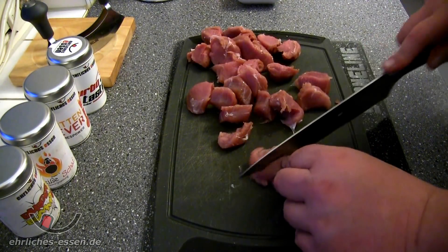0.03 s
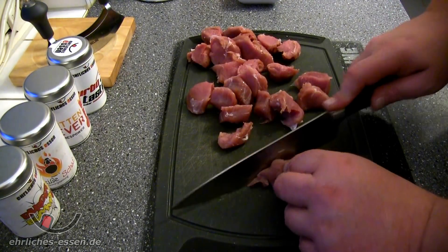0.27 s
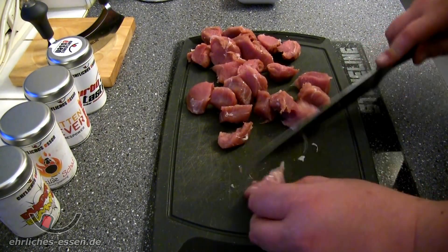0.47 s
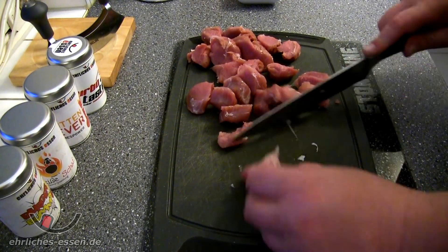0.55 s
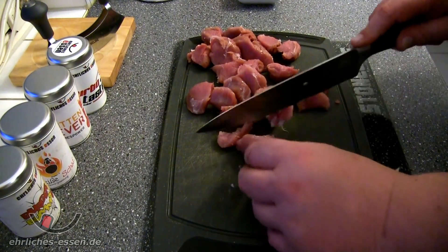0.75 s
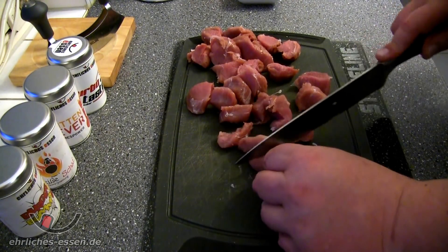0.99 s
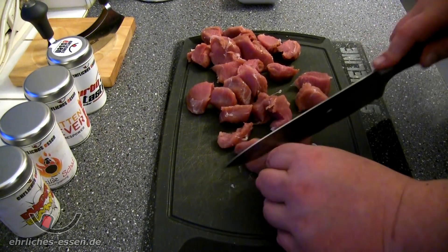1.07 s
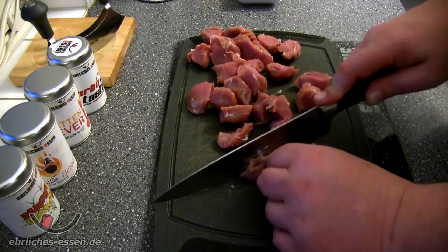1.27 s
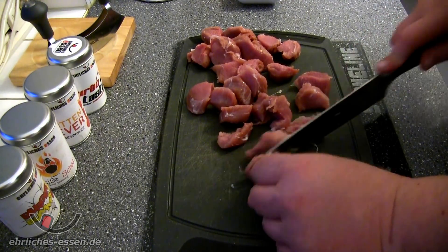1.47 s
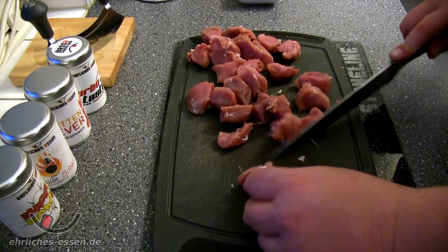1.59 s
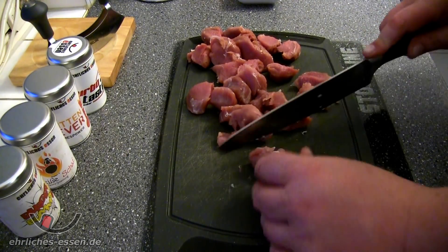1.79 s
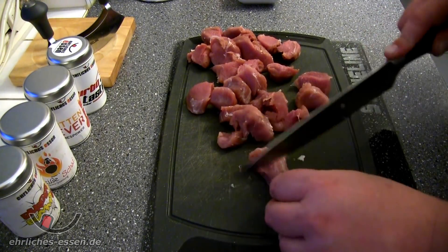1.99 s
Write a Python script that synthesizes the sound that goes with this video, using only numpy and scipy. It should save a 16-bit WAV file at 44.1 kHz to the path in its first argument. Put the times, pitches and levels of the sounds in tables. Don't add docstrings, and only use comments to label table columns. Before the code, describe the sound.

Knife strokes through raw meat: sharp board knocks, a raspy scrape, a ringing flick, then again

```python
import sys
import numpy as np
from scipy import signal
from scipy.fft import rfft, irfft
from scipy.io import wavfile

SR = 44100
rng = np.random.default_rng(int(sys.argv[2]) if len(sys.argv) > 2 else 0)


def log_audio(samples):
    frames = np.atleast_2d(samples).T
    limited = np.clip(frames, -1, 1)
    pcm = np.round(limited * 32767).astype(np.int16)
    wavfile.write(sys.argv[1], SR, pcm)


def nominal_scale(level):
    x = np.asarray(level, float) / 20
    return 10 ** x


N = 90404
OWN_SHARE = .2
THUD_HZ = 800


def rms_one(x):
    return x / np.sqrt(np.mean(x ** 2) + 1e-20)


def split_at(x, hz):
    return [signal.sosfilt(signal.butter(2, hz, kind, fs=SR, output="sos"), x) for kind in ("low", "high")]


def colour(x, points):
    size = 2 ** 17
    hz, db = np.transpose(points)
    bins_hz = np.arange(size // 2 + 1) * SR / size
    log_gain = np.interp(np.log(bins_hz + 1), np.log(hz), db) * np.log(10) / 20
    cepstrum = irfft(log_gain)
    cepstrum[1:size // 2] *= 2
    cepstrum[size // 2 + 1:] = 0
    return irfft(rfft(x, size) * np.exp(rfft(cepstrum)))[..., :N]


def ring(x, hz, t60):
    r, w = nominal_scale(-60 / (t60 * SR)), 2 * np.pi * hz / SR
    return signal.lfilter([0, np.sin(w)], [1, -2 * r * np.cos(w), r * r], x + 1e-18)


def width_t60(width_hz):
    return np.log(1000) / np.pi / width_hz


def pair(x, share):
    return np.sqrt(1 - np.clip(share, 0, 1) ** 2) * x[0] + share * x[1:]


def wobble(rate_hz, size):
    r = np.exp(-2 * np.pi * rate_hz / SR)
    return rms_one(signal.lfilter([1], [1, -2 * r, r * r], rng.standard_normal(size)))


def strokes(tables):
    t, out = np.arange(N) / SR, 0
    for rows in tables:
        s, db, bright_db, weight_db = np.transpose(rows)
        fade = np.clip(np.minimum(t - s[0], s[-1] - t) / 0.0065, 0, 1)
        gains = nominal_scale([np.interp(t, s, db + extra) for extra in (0 * db, bright_db, weight_db)])
        out = out + fade * gains
    return out


def slips():
    slips_per_s, spread_db, chatter_db, chatter_hz = 5000, 1, -1, 48.6
    size = nominal_scale(spread_db * np.minimum(rng.exponential(1, (3, N)), 4)) * rng.choice([-1, 1], (3, N))
    clicks = size * (rng.random((3, N)) < slips_per_s / SR)
    return rms_one(pair(clicks, OWN_SHARE) * nominal_scale(chatter_db * wobble(chatter_hz, N)))


def resonances(drive, peaks):
    out, t = 0, np.arange(N) / SR
    second_s, tilt_times_s, sag = 1.1, (.515, 1.628), .82
    for half, tilt_s, spot in zip((t < second_s, t >= second_s), tilt_times_s, peaks):
        push = drive * half
        for k, (hz, width, db) in enumerate(spot):
            gain, t60 = nominal_scale(db) * np.sqrt(width) * (-1) ** k, width_t60(width)
            if 1200 < hz < 1400:
                upright = ring(push * (t < tilt_s), hz, t60)
                tipped = ring(push * (t >= tilt_s), hz * sag, t60 / 2)
                out = out + gain * (upright + tipped)
            else:
                out = out + gain * ring(push, hz, t60)
    return out


def edge_on_board(tables, board, peaks, ring_db, firm_db):
    # f/Hz, level/dB per Hz
    rasp_spectrum = [(1500, -30.5), (2800, 0.5), (4000, -0.5), (5200, -2.5), (7400, -7), (11000, -12.5),
                     (14000, -21), (16000, -22)]
    weight_hz, weight_boost_db = 690, 6
    press, bright, weight = strokes(tables)
    drive = slips()
    low, high = split_at(drive, weight_hz)
    body = press * high - nominal_scale(weight_boost_db) * weight * low
    coupled = body * np.minimum(press / nominal_scale(firm_db), 1)
    rings = resonances(coupled, peaks)
    broad = colour(body, board)
    rasp = colour(bright * drive * rng.choice([-1, 1], N), rasp_spectrum)
    body_level = np.sqrt(np.mean(press ** 2 + weight ** 2)) * nominal_scale(-5)
    rasp_level = np.sqrt(np.mean(bright ** 2))
    return body_level * (rms_one(broad) + nominal_scale(ring_db) * rms_one(rings)) + rasp_level * rms_one(rasp)


def cutting():
    # t/s, pressure level/dB, brightness/dB, weight/dB
    cuts = [
        [(.06, -67.5, 7, 9), (.13, -57, 0, 12.5), (.232, -39, -2.5, 10.5), (.2385, -22, -13.5, 4.5),
         (.262, -18, -17, -18.5), (.282, -20.5, -19, -12), (.34, -37.5, -16, -5), (.37, -72, -17, -2)],
        [(1.2, -74, 6, -9), (1.24, -46, -6, 2), (1.27, -45, -11, 6.5), (1.3075, -44, -1, 14.5),
         (1.3095, -19.5, -14.5, 0), (1.324, -27.5, -9.5, -3.5), (1.39, -38, -23, -2.5), (1.43, -53, -18, 14)],
    ]
    # f/Hz, width/Hz, level/dB
    peaks = [
        [(548, 35, -8), (1290, 90, -4), (1450, 50, -4), (1834, 40, -1), (2005, 45, -5), (2855, 80, -3),
         (4820, 50, -14), (7600, 70, -22)],
        [(550, 40, -11), (1291, 35, 2), (1810, 82, -7), (2135, 40, -3), (2630, 45, -9), (2990, 42, -6),
         (3850, 80, -10), (4400, 60, -11), (7900, 40, -17)],
    ]
    # f/Hz, level/dB per Hz
    board = [
        [(50, -43), (130, 6.5), (300, -15.5), (600, -7.5), (820, -7), (1600, -5.5), (4000, -15.5),
         (7000, -41.5)],
        [(50, -93), (130, -3.5), (300, -20), (580, 1), (820, -6), (1300, 10), (4000, -2.5), (7000, -27)],
    ]
    return edge_on_board(cuts, board[0], peaks, ring_db=-3, firm_db=-44)


def scraping():
    # t/s, pressure level/dB, brightness/dB, weight/dB
    scrapes = [
        [(0.35, -39.5, -15, -2), (0.438, -27.5, -6.5, 3), (0.448, -31, -2.5, 7), (0.526, -30, -5.5, 7),
         (0.536, -28, -8, 10.5), (0.566, -27.5, -3, -27), (0.618, -43, 3.5, -17), (0.636, -33.5, -14, -4),
         (0.68, -43, -7, -12)],
        [(1.41, -45, -14, 11), (1.492, -35, -7, -25), (1.504, -29.5, -5, -18), (1.518, -31.5, -9, -81),
         (1.6, -29, -6, -4.5), (1.676, -36.5, -7.5, 14.5), (1.708, -27, -1.5, -11), (1.82, -42.5, -17, -16),
         (2.05, -53, -4.5, -23)],
    ]
    # f/Hz, width/Hz, level/dB
    peaks = [
        [(562, 32, -6.5), (1254, 20, -15), (1303, 29, 5), (1472, 27, -11), (1928, 19, -5), (2324, 32, -2),
         (2850, 44, -28.5), (3620, 30, -15), (4300, 68, -28), (5340, 35, -30), (7150, 120, -11),
         (10020, 88, -14)],
        [(556.5, 13, -6), (635, 42, -7.5), (1110, 53, 3.5), (1319, 37, 4.5), (1990, 35, -14), (2285, 48, -6),
         (2810, 72, -17), (3730, 30, -16), (4420, 65, -10), (5320, 79, -10), (6450, 40, -32)],
    ]
    # f/Hz, level/dB per Hz
    board = [
        [(50, -43), (130, 6.5), (300, -15.5), (600, -7.5), (820, -7), (1600, -5.5), (4000, -15.5),
         (7000, -41.5)],
        [(50, -93), (130, -3.5), (300, -20), (580, 1), (820, -6), (1300, 10), (4000, -2.5), (7000, -27)],
    ]
    return edge_on_board(scrapes, board[1], peaks, ring_db=1, firm_db=-26)


def knocks():
    # t/s, peak level/dB, thud level/dB
    hit_table = [(.1105, -24, 2.5), (0.2377, -5.5, -1.5), (.2700, -5.5, -11), (.5450, -10.5, 1),
                 (.5948, -5, -3), (.621, -38, -19), (1.2985, -26.5, 7), (1.3080, -5.5, -8.5),
                 (1.318, -30, 7.5), (1.329, -10, -17), (1.5010, -18, -25), (1.5440, -13, -30),
                 (1.558, -16, -25), (1.6005, -11, -23), (1.685, -38, -15), (1.691, -13, 6),
                 (1.7, -7.5, 4.5), (1.7068, -3.5, -26), (1.7185, -13, 2), (1.738, -8, 2),
                 (1.776, -23.5, 8.5)]
    # f/Hz, level/dB, t60/s
    modes = [(161, -16.5, 0.08), (569, -14.5, 0.45), (846, -51, 0.031), (1156, 5.5, 0.0074),
             (2110, -13, 0.084), (3150, -19, 0.015)]
    out, vary_db = 0, rng.normal(0, 1.9, (len(hit_table), len(modes)))
    s, db, thud_db = np.transpose(hit_table)
    for k, (hz, mode_db, t60) in enumerate(modes):
        hits = np.zeros((2, N))
        hits[:, (s * SR).astype(int)] = nominal_scale(db - 11.5 + mode_db + vary_db[:, k] + [thud_db, 0 * db])
        out = out + ring(hits, hz, t60)
    low, _ = split_at(out[0], THUD_HZ)
    _, high = split_at(out[1], THUD_HZ)
    return signal.lfilter(*signal.butter(1, 2600, fs=SR), high - low)


def blade():
    # t/s, length/s, level/dB, head start of the low modes/s
    flicks = [
        (0.549, 0.039, -19.5, .02),
        (1.687, 0.051, -23.5, .004),
    ]
    # f/Hz, level/dB, t60/s
    blade_modes = [
        [(549, -6, .13), (996, -12, .17), (1300, -9, .07), (1480, -6, .08), (1728, -18, .3), (2067, -20, .3),
         (2240, -19, .25), (2350, -16, .26), (3270, -15, .15), (5227, -18, .17), (6160, -25, .15),
         (7267, -26, .2), (8678, -25, .15), (10060, -27, .13)],
        [(312, -19, .5), (551, -6, .22), (921, -12, .35), (1475, -14, .2), (1717, -14, .25), (2330, -14, .15),
         (3138, -14, .25), (3257, -21, .28), (3970, -15, .15), (4247, -21, .25), (5416, -22, .2),
         (6200, -21, .22), (7400, -21, .12), (8646, -26, .25)],
    ]
    # f/Hz, width/Hz, level/dB
    bodies = [
        [(438, 30, -30), (992, 35, -26), (1220, 390, -24.5), (1466, 100, -25), (3770, 56, -37),
         (5200, 200, -35), (1570, 28, -48), (7400, 300, -37.5)],
        [(437, 43, -29.5), (685, 38, -27), (1150, 150, -27), (3130, 130, -29.5), (4000, 76, -31.5),
         (7370, 84, -41.5), (1630, 40, -34), (5440, 100, -40.5)],
    ]
    twin_hz, twin_db, flutter_db, flutter_hz = 19, -5, 5, 35
    out, t = np.zeros((2, N + SR)), np.arange(SR // 2) / SR
    for (s, length, db, lead), modes, peaks in zip(flicks, blade_modes, bodies):
        i = int((s - lead) * SR)
        part = out[:, i:i + len(t)]
        push = pair(rng.standard_normal((3, len(t))), OWN_SHARE)
        early, main = (np.sin(np.pi * np.clip((t - wait) / length, 0, 1)) for wait in (0, lead))
        for hz, width, peak_db in peaks:
            burst = push * (early if hz < THUD_HZ else main)
            part += nominal_scale(peak_db) * np.sqrt(width * 4 * np.pi / SR) * ring(burst, hz, width_t60(width))
        for hz, mode_db, t60 in modes:
            shape = (early + main if hz < THUD_HZ else 2 * main) / 2
            for step_hz, step_db in ((0, 0), (twin_hz * rng.choice([-1, 1]), twin_db)):
                swing = shape * np.sin(2 * np.pi * ((hz + step_hz) * t + rng.random())) * 2 / (length * SR)
                gain = nominal_scale(db + mode_db + step_db + 9.5 + flutter_db * wobble(flutter_hz, len(t)))
                part += gain * ring(swing, hz + step_hz, t60)
    return out[:, :N]


def ticks():
    # t/s, peak level/dB, f/Hz, t60/s
    tick_table = [(.757, -40, 11800, 0.03), (0.945, -47.5, 7900, 0.057), (1.092, -48, 5850, 0.024),
                  (1.168, -39.5, 6400, 0.029), (1.195, -41, 6400, 0.019), (1.211, -46, 9400, 0.27),
                  (1.242, -29.5, 4630, 0.18), (1.245, -41, 8700, 0.98), (1.242, -45, 13500, 0.28)]
    out, t = np.zeros((2, N)), np.arange(6000) / SR
    for s, db, hz, t60 in tick_table:
        i = int(s * SR)
        noise = pair(rng.standard_normal((3, len(t))), OWN_SHARE)
        band = signal.butter(2, [hz * 0.81, min(hz * 1.18, 20000)], "band", fs=SR, output="sos")
        out[:, i:i + len(t)] += nominal_scale(db) * signal.sosfilt(band, noise * nominal_scale(-60 * t / t60))
    return out


def squeaks():
    # t/s, f/Hz, level/dB
    tones = [
        [(1.85, 12620, -70), (1.88, 13100, -64), (1.906, 12540, -68), (1.95, 13270, -65), (1.974, 13400, -68),
         (1.99, 13780, -65), (2.004, 13550, -64), (2.022, 12850, -65), (2.04, 11850, -72)],
        [(1.922, 10450, -72), (1.95, 10950, -67), (1.976, 11250, -69)],
        [(1.975, 12600, -73), (1.992, 13150, -67), (2.014, 12550, -68)],
    ]
    rough_db, jitter_hz = 3, 25
    out, t = 0, np.arange(N) / SR
    for rows in tones:
        s, hz, db = np.transpose(rows)
        fade = np.clip(np.minimum(t - s[0], s[-1] - t) / .004, 0, 1)
        pitch_hz = np.interp(t, s, hz) + jitter_hz * wobble(140, N)
        gain = nominal_scale(np.interp(t, s, db) + rough_db * wobble(80, N))
        out = out + np.sqrt(2) * fade * gain * np.sin(2 * np.pi * np.cumsum(pitch_hz) / SR)
    return out


def worktop(mid):
    # f/Hz, level/dB
    width_spectrum = [(300, -12), (1200, -15), (2500, -8.5), (5000, -6.5), (9000, -10.5), (14000, -10)]
    wide = colour(mid, width_spectrum)
    echoes = [(nominal_scale(-4), lag_s) for lag_s in (0.001153, .0073, .0127)]
    return sum(gain * np.roll(wide, int(lag_s * SR)) for gain, lag_s in echoes) * [[1], [-1]]


def kitchen(x):
    t60_s, wall_cut_hz = 0.6, 13600
    size = 3 * 2 ** 16
    z = np.exp(-2j * np.pi * np.arange(size // 2 + 1) / size)
    dull, out = np.exp(-2 * np.pi * wall_cut_hz / SR), np.zeros((2, len(z)), complex)
    for k, lag in enumerate((rng.uniform(.012, .045, 20) * SR).astype(int)):
        loop = nominal_scale(-60 * lag / SR / t60_s) * (1 - dull) / (1 - dull * z) * z ** lag
        out[k % 2] += loop / (1 - loop) * (-1) ** (k // 2)
    for lag in (53, 131, 241):
        out *= (z ** lag - .6) / (1 - 0.77 * z ** lag)
    return irfft(out * rfft(x, size))[:, :N]


def hiss():
    # t/s, level/dB
    swell = [(0, 7.5), (.3, 18), (.9, 8.5), (1.03, 1.5), (1.2, 5), (1.8, 16.5), (2.05, 2.5)]
    # f/Hz, level/dB per Hz
    spectrum = [(25, -59), (60, -9.5), (120, -4.5), (550, 3), (900, -4.5), (2400, -10.5), (7000, -16),
                (13000, -22.5), (15600, -22.5)]
    s, db = np.transpose(swell)
    noise = colour(pair(rng.standard_normal((3, N)), .22), spectrum)
    return nominal_scale(-60 + np.interp(np.arange(N) / SR, s, db)) * rms_one(noise)


def scene():
    near = cutting() + scraping() + knocks() + blade() + ticks() + squeaks()
    near = signal.sosfilt(signal.butter(2, 261, "high", fs=SR, output="sos"), near)
    mid = near.mean(axis=0)
    near = near + worktop(mid)
    pan_db = 0.56
    return near * nominal_scale([[pan_db], [-pan_db]]) + nominal_scale(-21.5) * kitchen(mid) + hiss()


def roll_off(x):
    return signal.sosfilt(signal.butter(12, 15750, fs=SR, output="sos"), x)


def record(dry):
    left_bass_hz, left_bass_db = 133, 3.5
    bass = signal.lfilter(*signal.butter(1, left_bass_hz, fs=SR), dry)
    x = dry + bass * (nominal_scale([[left_bass_db / 2], [-left_bass_db / 2]]) - 1)
    x = signal.sosfilt(signal.cheby2(20, 60, 15750, fs=SR, output="sos"), x)
    return roll_off(x)


dry = scene()
out = record(dry)
log_audio(out)
```